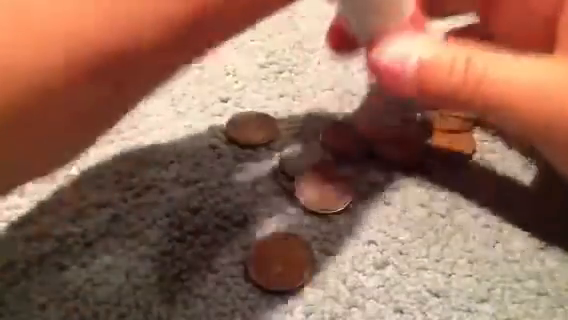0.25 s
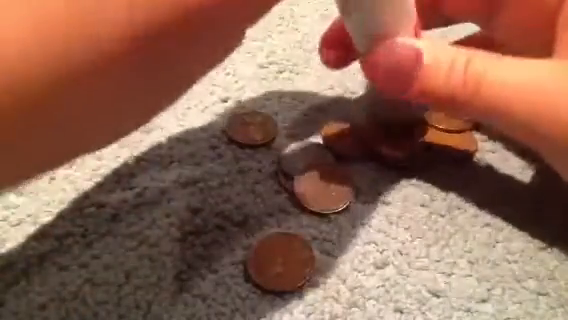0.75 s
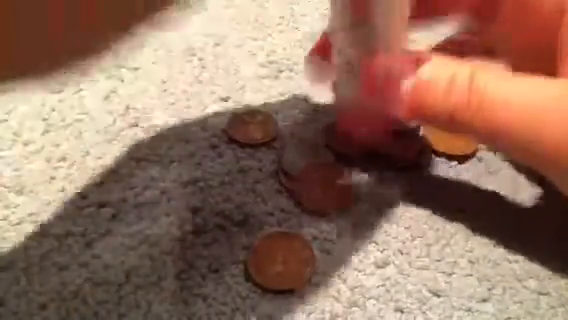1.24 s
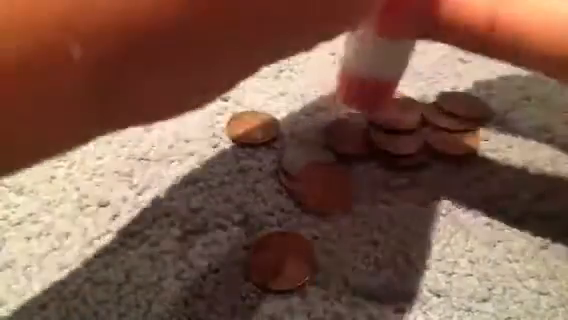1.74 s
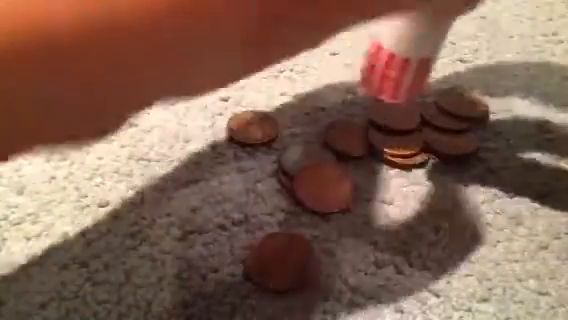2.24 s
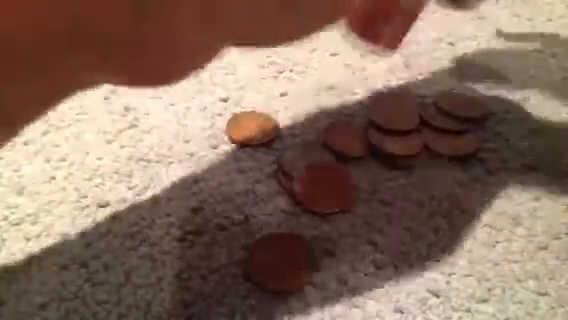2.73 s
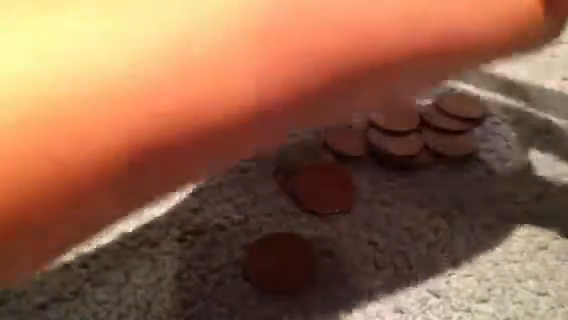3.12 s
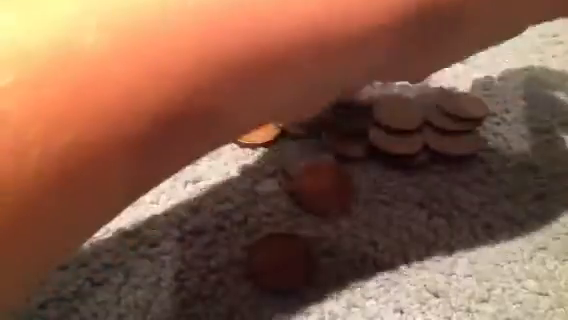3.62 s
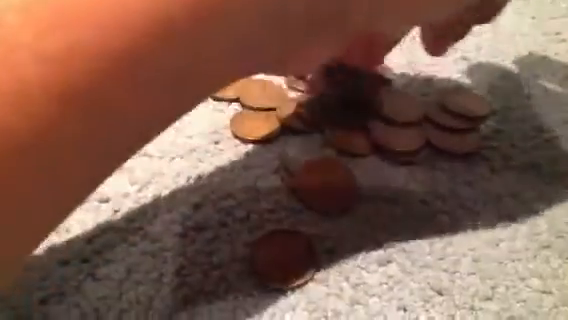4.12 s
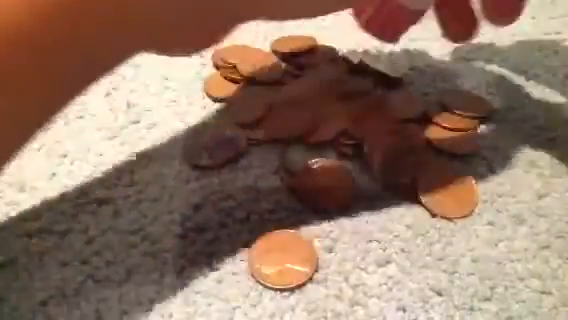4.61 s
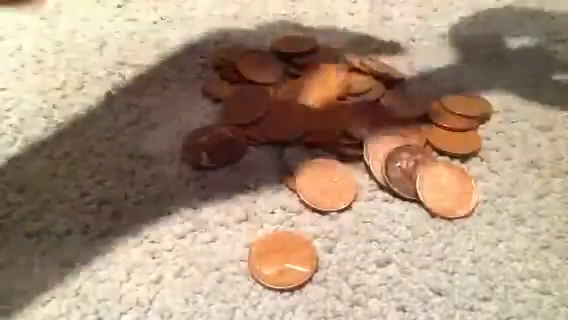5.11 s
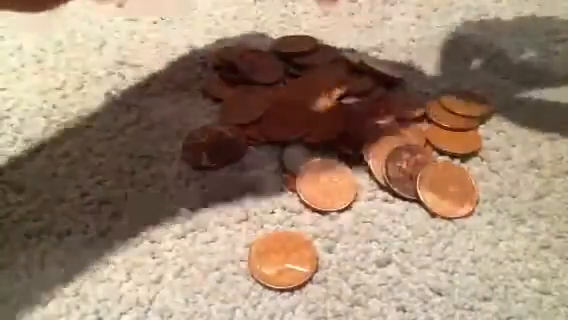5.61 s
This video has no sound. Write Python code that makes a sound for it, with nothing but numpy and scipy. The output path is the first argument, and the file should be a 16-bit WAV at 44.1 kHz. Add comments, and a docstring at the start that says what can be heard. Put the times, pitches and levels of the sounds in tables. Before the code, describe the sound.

In a quiet carpeted room, heard very close, a lone coin ring fades and a paper tube is tapped. Two short bursts of small coins clink. The roll then crackles and rubs softly under fingers before the remaining coins slide out in a bright, dense jingling run with soft low thuds. Only hum remains until a few light taps and paper crackles at the end.

```python
"""A lone coin rings out, a paper tube is tapped, then two short spills of small coins land close by.
The roll squeaks, crackles and rubs under the fingers; then the rest of the coins slide out in a run.
Each contact is a noise tick, a sizzle of upper modes and a coin ring near 12 kHz; carpet thuds lie below.
At the end the tube is tapped and the paper crackles. Mains hum, fan resonances and air noise fill the room.
"""
import sys
import numpy as np
from scipy import signal
from scipy.fft import rfft, irfft
from scipy.io import wavfile
from scipy.ndimage import uniform_filter1d, minimum_filter1d

SR = 44100
rng = np.random.default_rng(int(sys.argv[2]) if len(sys.argv) > 2 else 0)


def output_pcm(signal):
    """Save a mono or channel-first signal as 16-bit PCM at the path in sys.argv[1].

    Samples are clipped to [-1, 1] before scaling.
    """
    pcm = np.clip(np.atleast_2d(signal).T, -1, 1) * 32767
    wavfile.write(sys.argv[1], SR, np.round(pcm).astype(np.int16))


N = 258426
TIME_S = np.arange(N) / SR

# All *_rel_db columns are relative levels: the sources trim or filter them further.
# distinct coin blows: start_s, ring_hz, tick_rel_db, sizzle_rel_db, ring_rel_db, knock_rel_db
CLINKS = [(0.667, 12000, -22, -17, -16.5, -67), (0.677, 12460, -18, -14, -21, -65),
          (0.6806, 12650, -39.5, -23.5, -12, -77.5), (0.724, 12620, -39.5, -22.5, -36, -64.5),
          (0.767, 12000, -38.5, -39.5, -48.5, -54), (0.8049, 12230, -19.5, -13, -16, -53),
          (0.816, 12180, -21, 1, -25.5, -60), (0.819, 12100, -20.5, -20.5, -11, -61),
          (0.864, 12610, -26.5, -12, -28, -61), (3.1694, 12360, -13, 1.5, -14, -41),
          (3.1717, 12370, -13.5, -11, -24.5, -36), (3.2417, 11720, -17.5, -18.5, -15, -51),
          (3.2455, 12000, -21, -17, -28, -34), (3.263, 12250, -17, -15, -24.5, -30.5),
          (3.264, 12260, -24.5, -16.5, -21, -52.5), (3.276, 11850, -36.5, -28.5, -18.5, -57),
          (3.286, 11790, -31.5, -21, -12.5, -53.5), (3.3245, 12170, -21.5, -21, -21, -44.5),
          (3.343, 12220, -33, -8.5, -26, -60), (3.3492, 12120, -28.5, -17.5, -19.5, -56),
          (3.3848, 11930, -32, -22.5, -27.5, -63.5), (3.4819, 12200, -18, -19, -27.5, -39),
          (3.4957, 12220, -17, -8.5, -8, -40.5), (3.502, 12210, -24.5, -7.5, -22.5, -45),
          (3.5184, 12400, -17, -14.5, -16.5, -38.5), (3.529, 12400, -14.5, -16.5, -9, -36),
          (3.557, 12030, -24.5, -8, -19.5, -37.5), (3.629, 12530, -25.5, -17, -26, -61),
          (3.654, 12200, -27, -16, -24, -60.5), (3.6814, 12410, -35, -20, -22, -65),
          (3.704, 12570, -24, -4.5, -16.5, -54), (3.8123, 12700, -25, -15, -30, -49.5),
          (3.8324, 12700, -21.5, 0, -31, -50), (3.8938, 12590, -27.5, -13, -20, -60),
          (3.9525, 12230, -25, -12, -31, -51), (3.956, 12700, -19, 0, -25, -50),
          (3.9732, 12500, -15.5, -5, -21.5, -49), (3.9883, 12500, -14, -1, -22, -51),
          (3.9999, 12560, -15, -5, -21, -52), (4.006, 12170, -11, -1.5, -17.5, -43),
          (4.015, 12400, -15.5, -9, -23, -43), (4.0311, 12100, -19, -3, -25, -61),
          (4.0445, 12400, -27, -15, -24, -54), (4.105, 12410, -38.5, -18, -23, -56),
          (4.118, 12200, -40, -15, -32, -59), (4.142, 12230, -19.5, -8, -40, -57),
          (4.2059, 12520, -11, -3.5, -32, -43.5), (4.2172, 12700, -10.5, 4, -14, -38.5),
          (4.229, 12550, -22, -2, -20, -44), (4.2651, 12090, -31, -19, -26, -56),
          (4.2698, 12090, -42, -11, -16.5, -63), (4.332, 12260, -20.5, -1, -33, -54),
          (4.3501, 12200, -22, 5, -32, -36), (4.395, 12300, -23, -5, -22.5, -49),
          (4.412, 12300, -29, -5, -37, -61), (4.437, 12250, -16, -2, -16, -37.5),
          (4.486, 12000, -28, -3, -26, -42.5), (4.536, 12310, -31, -15, -22, -48),
          (4.638, 12120, -38, -19, -34, -55)]
# pinched coins clack briefly: start_s, pitch_hz, level_db, t60_s
CLACKS = [(0.667, 13300, -19.5, 0.012), (0.804, 8300, -18, 0.0054), (3.1694, 6220, -18, 0.012),
          (3.246, 6680, -35, 0.052), (3.287, 6840, -34, 0.048), (3.343, 7300, -33, 0.06),
          (3.9524, 10480, -19.5, 0.012), (4.141, 6500, -22, 0.0069), (4.33, 14300, -26, .008),
          (4.3491, 10100, -12, 0.0053), (4.349, 14870, -24, .006)]
# coins that lie free and ring on: start_s, pitch_hz, level_rel_db, t60_s
FREE_RINGS = [(0.0, 12367, -41, .34), (0.6792, 12170, -28, .17), (0.8153, 12140, -18, .24),
              (0.8153, 12610, -25, .15), (3.169, 12370, -20, .25), (3.169, 11790, -25, .3),
              (3.169, 12260, -25, .45), (3.2413, 11790, -21, .2), (3.262, 12255, -18, .22),
              (3.3406, 12370, -23, .15), (3.3855, 12210, -29, .17), (3.4822, 12330, -11, .09),
              (3.7048, 12250, -32, .3), (3.842, 12350, -25, .22), (3.885, 11600, -30, .08),
              (4.031, 12310, -28, .2), (4.265, 12120, -21, .09), (4.488, 12241, -28, .2)]
# slides onto the pile: start_s, crest_s, stop_s (both after start),
# tick_rel_db, sizzle_rel_db, ring_rel_db, knock_rel_db
SPILLS = [(0.666, 0.005, 0.058, -48, -32, -26.5, -64), (0.799, 0.006, 0.075, -50, -41, -36, -59),
          (3.238, 0.022, 0.14, -48.5, -37, -20.5, -88), (3.484, 0.014, 0.081, -43, -26.5, -25.5, -51),
          (3.627, 0.078, 0.09, -45, -32, -29, -63.5), (3.82, 0.0085, 0.47, -48, -36, -32, -59.5),
          (3.93, 0.021, 0.15, -42, -36, -36.5, -53.5), (4.109, 0.067, 0.09, -43, -33.5, -42, -51),
          (4.194, 0.01, 0.1, -41.5, -30.5, -35, -54.5), (4.318, 0.032, 0.049, -48, -41, -48, -58.5),
          (4.391, 0.038, 0.058, -42, -26.5, -31.5, -55.5), (4.478, 0.01, 0.27, -42.5, -36, -36, -52.5)]
# main bending mode of each coin in the pile: pitch_hz
COINS_HZ = [11990, 12050, 12120, 12175, 12245, 12275, 12315, 12365, 12400, 12445, 12500, 12565, 12680,
            12845]
# higher coin modes: pitch_hz
UPPER_HZ = [12968, 13112, 13584, 14075, 14304, 14788, 14855, 14997]
# spectrum of a coin tick: freq_hz, density_rel_db (per Hz)
TICK = [(1500, -46), (3500, -9), (5000, -2), (6800, 0.5), (9000, 1), (11000, 5), (12000, -3.5),
        (13000, -22), (15400, -27)]
# spectrum of the sizzle, the crowd of upper modes: freq_hz, density_rel_db (per Hz)
SIZZLE = [(9000, -57), (11500, -5), (12600, -6), (13300, -2), (14400, -1), (15200, -1.5), (15800, -3)]
# spectrum of a knock on the pile: freq_hz, density_rel_db (per Hz)
KNOCK = [(60, -24.5), (150, 12), (350, 16.5), (700, 6), (1500, 6.5), (3000, 4.5), (6000, -17), (12000, -25)]
# coins and roll landing on the carpet: start_s, thud_rel_db, note_hz, note_rel_db, t60_s
THUDS = [(0.681, -44, 468, -44.5, 0.15), (0.686, -50, 972, -48, 0.078), (0.813, -28.5, 405, -44.5, 0.037),
         (3.17, -27, 161, -36, 0.038), (3.251, -32.5, 360, -31, 0.041), (3.262, -27.5, 203, -35, .05),
         (3.28, -38, 332, -35, 0.092), (3.34, -33, 289, -37.5, 0.095), (3.352, -45, 660, -42, 0.09),
         (3.486, -32.5, 254, -42.5, .07), (3.515, -35.5, 427, -48, 0.084), (3.527, -35, 246, -34, .07),
         (4.424, -44, 376, -42, 0.14), (4.437, -41, 574, -43, 0.025), (4.463, -54, 343, -42, 0.038),
         (4.487, -35, 258, -35, 0.032), (4.515, -56, 307, -45, 0.024), (4.535, -51, 342, -35.5, 0.03)]
# spectrum of a thud: freq_hz, density_rel_db (per Hz)
THUD = [(25, -47), (40, -19.5), (80, -15), (130, 4.5), (250, 1.5), (380, -3), (700, -4), (1200, -14.5),
        (4000, -52.5)]
# paper roll crackles: start_s, level_rel_db
CRACKLES = [(0.122, -50), (0.2594, -50), (0.601, -49), (1.169, -44), (1.236, -51), (1.304, -49),
            (1.691, -43), (5.345, -49), (5.806, -47)]
# fingers and coins sliding on paper: start_s, length_s, level_rel_db, first_hz, last_hz
RUBS = [(1.084, 0.11, -55.5, 5880, 5500), (1.204, 0.096, -55.5, 6750, 5940),
        (1.669, 0.073, -55.5, 6940, 6950), (1.756, 0.082, -56.5, 5600, 5630),
        (2.07, 0.038, -59, 4470, 4440), (2.404, 0.077, -52, 6500, 6000), (2.711, 0.067, -49.5, 6770, 6000),
        (2.74, 0.12, -48.5, 5400, 4100), (2.775, 0.026, -52, 4000, 3900), (3.408, 0.12, -53.5, 7000, 7500)]
# coins slipping down the tube: start_s, length_s, pitch_hz, width_hz, level_rel_db
SQUEAK = (.85, .11, 1500, 160, -62)
# light taps on the hollow tube: start_s, level_rel_db
TAPS = [(0.511, -49), (5.391, -45.5), (5.424, -40.5), (5.511, -37)]
# spectrum of the paper tube: freq_hz, density_rel_db (per Hz)
PAPER = [(300, -25), (1000, -19), (1400, -4), (1900, -7), (3000, -4), (4200, 2), (5800, 2.5), (9000, -2),
         (15000, -2)]
# fan resonances: centre_hz, half_width_hz, level_rel_db
FAN = [(142.4, 3.6, -61.5), (167.8, 3.8, -58), (386.2, 14.4, -62.5), (823.3, 10, -67), (862, 12, -67.5)]
# spectrum of the room air: freq_hz, density_rel_db (per Hz)
AIR = [(25, -53), (55, -28), (95, -15), (135, -7.5), (175, -3), (290, -8), (400, -4.5), (580, -16.5),
       (850, -17), (1050, -25.5), (2000, -36), (5000, -37.5), (15000, -38.5)]
# background swell: time_s, gain_db
SWELL = [(0, -4.5), (.5, -1.5), (1.2, -1.5), (2.8, 4.5), (3.8, -2.5), (5.2, 0.5), (5.8, 3.5)]

GATHER_DB, EBB_DB_PER_S, STOP_DB_PER_S = 8, 70, 350
SPOT_DB = 1.5  # standard deviation of the spectrum with the spot struck
REBOUND = .45  # rebound size of a landing coin
TUBE_HZ, TUBE_DB, TUBE_T60_S = 1400, -9, .02  # level is relative to the tap
EDGE_HZ = 15330


def amp(db):
    """Decibels to gain."""
    return 10 ** (np.asarray(db) / 20)


def unit(x):
    """Scale to rms 1."""
    return x / np.sqrt(np.mean(x ** 2) + 1e-20)


def add(mix, start_s, sound):
    """Mix a sound in at start_s, in place."""
    part = mix[max(round(start_s * SR), 0):][:len(sound)]
    part += sound[:len(part)]


def convolve_unit(x, taps):
    """Convolve with taps of energy 1, cut to scene length."""
    return signal.oaconvolve(x, taps / np.linalg.norm(taps))[:N]


def colour(x, spectrum, size=4096):
    """Minimum-phase filter of energy 1 with the given spectrum."""
    hz, db = np.transpose(spectrum)
    bins_hz = abs(np.fft.fftfreq(size, 1 / SR))
    log_gain = np.log(amp(np.interp(np.log(bins_hz + 1), np.log(hz), db)))
    response = np.exp(np.conj(signal.hilbert(log_gain)))
    return convolve_unit(x, np.fft.ifft(response).real[:size // 2])


def fade(t60_s):
    """Exponential decay through 60 dB."""
    t = TIME_S[:int(max(t60_s, .001) * SR)]
    return np.exp(-np.log(1000) * t / t60_s)


def mode(hz, t60_s):
    """Struck mode: a decaying sine, envelope starting at 1."""
    decay = fade(t60_s)
    return decay * np.sin(2 * np.pi * hz * TIME_S[:len(decay)])


def chatter(t60_s, rebound=.3):
    """One contact: a sharp first touch, then tiny noise-like rebounds that decay."""
    decay = fade(t60_s)
    burst = rebound * decay * rng.standard_normal(SR)[:len(decay)]
    burst[0] += 2
    return burst


def contacts(per_s, spread_db):
    """Random train of small and large impulses, rms 1."""
    size = amp(spread_db * np.minimum(rng.exponential(1, N), 3))
    sign = rng.choice([-1, 1], N)
    hit = rng.random(N) < per_s / SR
    return unit(size * sign * hit)


def resonate(x, hz, width_hz):
    """Resonance that follows the curve hz: shift to 0 Hz, low-pass by a double pole, shift back."""
    turn = np.exp(2j * np.pi * np.cumsum(hz) / SR)
    r = np.exp(-np.pi * width_hz / SR)
    return (turn * signal.lfilter([(1 - r) ** 2], [1, -2 * r, r * r], x / turn)).real


def tick_of(spectrum, t60_s, rebound):
    """One contact through the given spectrum, varied by the spot struck."""
    hz, db = np.transpose(spectrum)
    varied_db = db + SPOT_DB * rng.standard_normal(len(hz))
    return colour(chatter(t60_s, rebound), np.transpose([hz, varied_db]))


def sizzle_of(t60_s, rebound, upper_db=-21, upper_t60_s=.06):
    """Bright part of one contact: a crowd of brief modes, out of which two ring on."""
    out = tick_of(SIZZLE, t60_s, rebound)
    out = np.pad(out, (0, SR // 8))
    for hz in rng.choice(UPPER_HZ, size=2, replace=False):
        add(out, 0, amp(upper_db) * mode(hz, upper_t60_s))
    return out


def clinks(tick_db=-6, sizzle_db=-7, tick_t60_s=.028, ring_db=3, ring_t60_s=.075,
           partner_db=-9, knock_db=8, knock_t60_s=.031):
    """Each blow ticks and sizzles, rings both coins that meet (they beat) and knocks the pile."""
    ticks, rings, knocks = np.zeros((3, N))
    for start_s, hz, tick, sizzle, ring, knock in CLINKS:
        add(ticks, start_s, amp(tick + tick_db) * tick_of(TICK, tick_t60_s, REBOUND))
        add(ticks, start_s, amp(sizzle + sizzle_db) * sizzle_of(tick_t60_s, REBOUND))
        add(knocks, start_s, amp(knock + knock_db) * chatter(knock_t60_s, rebound=.21))
        add(rings, start_s, amp(ring + ring_db) * mode(hz, ring_t60_s) / 2)
        partner_hz = rng.choice(COINS_HZ)
        add(rings, start_s, amp(ring + partner_db) * mode(partner_hz, ring_t60_s))
    for start_s, hz, db, t60_s in CLACKS:
        add(rings, start_s, amp(db) * mode(hz, t60_s))
    return ticks + rings + colour(knocks, KNOCK)


def slide(crest_s, stop_s):
    """Strength of one slide: it gathers to a crest, ebbs while coins still move, then stops quickly."""
    t = TIME_S[:SR]
    gather = GATHER_DB * np.maximum(1 - t / max(crest_s, .001), 0)
    ebb = EBB_DB_PER_S * np.maximum(t - crest_s, 0)
    stop = STOP_DB_PER_S * np.maximum(t - stop_s, 0)
    return amp(-gather - ebb - stop)


def jostle(tick_db=2, sizzle_db=2, ring_db=-3, knock_db=0, ring_t60_s=.034):
    """Sliding coins touch hundreds of times a second; each has its own tick, sizzle and brief ring."""
    force = np.zeros((4, N))
    for start_s, crest_s, stop_s, *levels in SPILLS:
        for layer, db in zip(force, levels):
            add(layer, start_s, amp(db) * slide(crest_s, stop_s))
    touches = contacts(per_s=1100, spread_db=1.9)
    struck = rng.integers(0, len(COINS_HZ), N)
    out = amp(knock_db) * colour(touches * force[3], KNOCK)
    for coin, hz in enumerate(COINS_HZ):
        own = touches * (struck == coin)
        tick = tick_of(TICK, t60_s=.018, rebound=.33)
        sizzle = sizzle_of(t60_s=.018, rebound=.33)
        voices = [tick, sizzle, mode(hz, ring_t60_s)]
        for voice, push, db in zip(voices, force, (tick_db, sizzle_db, ring_db)):
            out += amp(db) * convolve_unit(own * push, voice)
    return out


def free_coins(free_db=0, low_hz=6760, low_db=-29, low_t60_s=.12):
    """Undamped coins sing on, with a faint lower partial whose pitch scales with the coin's."""
    out = np.zeros(N)
    for start_s, hz, db, t60_s in FREE_RINGS:
        add(out, start_s, amp(db + free_db) * mode(hz, t60_s))
        partial_hz = low_hz * hz / np.median(COINS_HZ)
        add(out, start_s, amp(db + low_db) * mode(partial_hz, low_t60_s))
    return out


def carpet():
    """The soft floor takes the weight with a short low thud and a quickly damped note."""
    push, notes = np.zeros((2, N))
    for start_s, db, hz, note_db, t60_s in THUDS:
        add(push, start_s, amp(db) * chatter(t60_s, rebound=.47))
        add(notes, start_s, amp(note_db) * mode(hz, t60_s))
    high_pass = signal.butter(3, 140, "high", fs=SR, output="sos")
    return colour(push, THUD) + signal.sosfilt(high_pass, notes)


def paper_roll(crackle_db=-4, grip_db=-69):
    """The wrapper rustles in fine grains while squeezed, and snaps now and then."""
    grain = contacts(per_s=1200, spread_db=4.5)
    grip = np.interp(TIME_S, [.9, 1.1, 2.9, 3.1], [0, 1, 1, 0])
    out = amp(grip_db) * grip * grain
    for start_s, db in CRACKLES:
        add(out, start_s, amp(db + crackle_db) * chatter(t60_s=.045, rebound=.6))
    return colour(out, PAPER)


def rubs(broad_db=-3, focus_db=-4, width_hz=2000):
    """Friction on paper swells into a smooth hiss, centred on a pitch that moves with the stroke."""
    broad, focused = np.zeros((2, N))
    for start_s, length_s, db, first_hz, last_hz in RUBS:
        stroke = amp(db) * np.hanning(int(length_s * SR))
        friction = rng.standard_normal((2, SR))[:, :len(stroke)]
        centre_hz = np.linspace(first_hz, last_hz, len(stroke))
        add(broad, start_s, stroke * friction[0])
        add(focused, start_s, stroke * unit(resonate(friction[1], centre_hz, width_hz)))
    return amp(broad_db) * colour(broad, PAPER) + amp(focus_db) * focused


def squeak():
    """Friction noise drives the hollow note of the tube."""
    start_s, length_s, hz, width_hz, db = SQUEAK
    stroke, out = np.hanning(int(length_s * SR)), np.zeros(N)
    friction = rng.standard_normal(SR)[:len(stroke)]
    note = resonate(friction, np.full(len(stroke), hz), width_hz)
    add(out, start_s, amp(db) * stroke * unit(note))
    return out


def tube_taps(click_db=0, click_t60_s=.0068):
    """A crisp click and the brief hollow note of the tube."""
    clicks, body = np.zeros((2, N))
    for start_s, db in TAPS:
        add(clicks, start_s, amp(db + click_db) * chatter(click_t60_s, rebound=.91))
        add(body, start_s, amp(db + TUBE_DB) * mode(TUBE_HZ, TUBE_T60_S))
    return colour(clicks, PAPER) + body


def room(x, wet_db=-23):
    """The carpeted room returns a faint, short tail of sparse decaying echoes."""
    decay = fade(t60_s=.38)
    echoes = rng.standard_normal(N) * (rng.random(N) < .1)
    return x + amp(wet_db) * convolve_unit(x, decay * echoes[:len(decay)])


def room_tone(air_db=-52, mains_hz=121.7, mains_db=-57):
    """Mains hum and wavering fan resonances (narrow noise) over soft air noise, swelling together."""
    out = amp(air_db) * colour(rng.standard_normal(N), AIR)
    bins_hz = np.fft.rfftfreq(N, 1 / SR)
    for hz, half_width_hz, db in FAN:
        line = rfft(rng.standard_normal(N)) / (1 + ((bins_hz - hz) / half_width_hz) ** 2)
        out += amp(db) * unit(irfft(line, N))
    out += amp(mains_db) * unit(np.sin(2 * np.pi * mains_hz * TIME_S))
    return out * amp(np.interp(TIME_S, *np.transpose(SWELL)))


def scene():
    """Coins and paper in the room, over the room tone."""
    coins = clinks() + free_coins() + jostle() + carpet()
    paper = paper_roll() + rubs() + squeak() + tube_taps()
    return (room(coins + paper) + room_tone())[None]


def record(dry):
    """A fast look-ahead limiter holds down the loudest peaks; then a low-pass at EDGE_HZ."""
    ceiling = .42
    gain = ceiling / np.maximum(abs(dry), ceiling)
    gain = uniform_filter1d(minimum_filter1d(gain, size=90), size=90)
    low_pass = signal.firwin(511, EDGE_HZ, window=("kaiser", 8), fs=SR)
    return signal.oaconvolve(dry * gain, low_pass[None], "same")


dry = scene()
out = record(dry)
output_pcm(out)
```